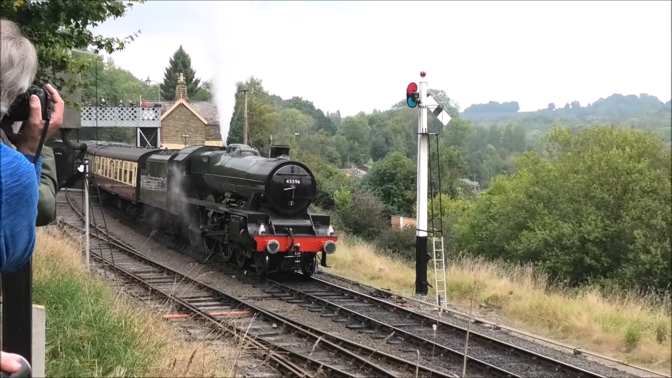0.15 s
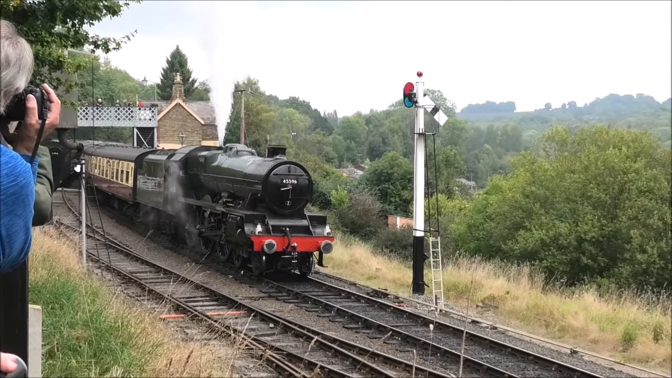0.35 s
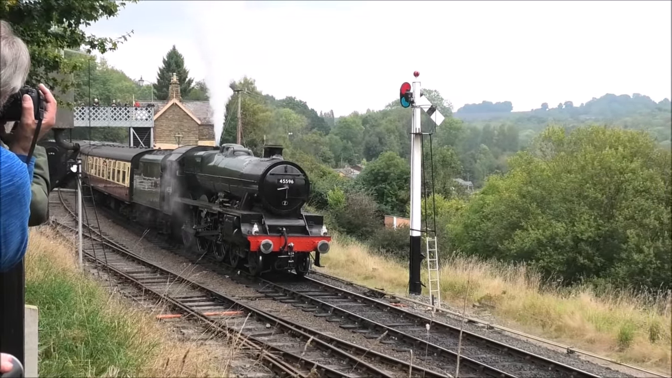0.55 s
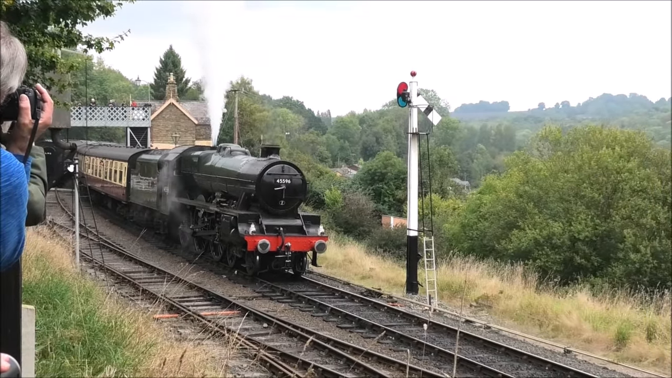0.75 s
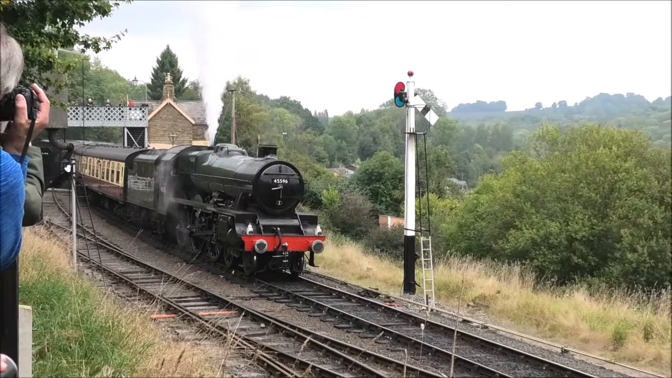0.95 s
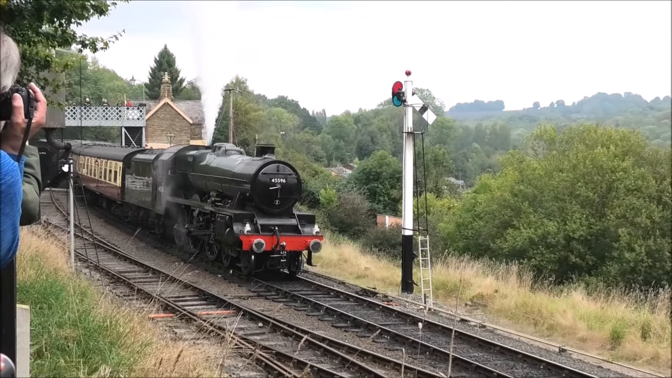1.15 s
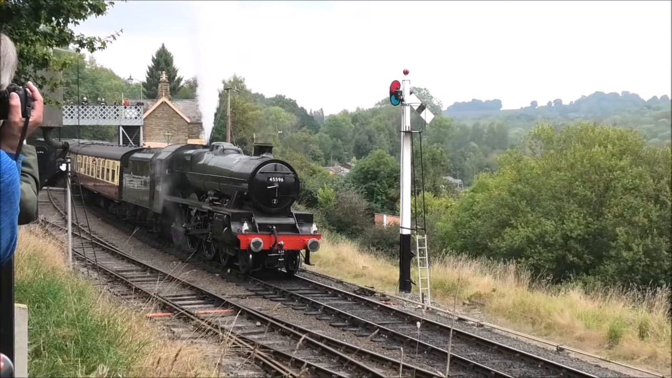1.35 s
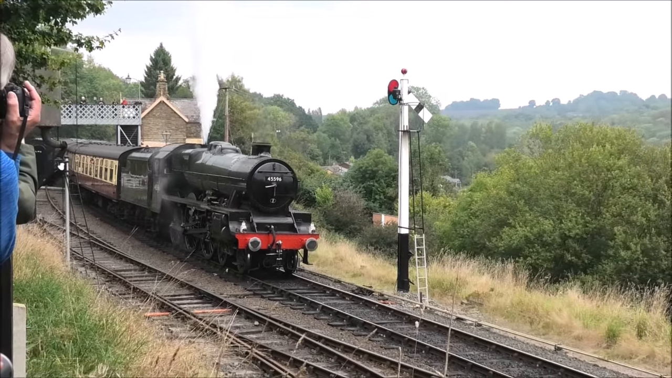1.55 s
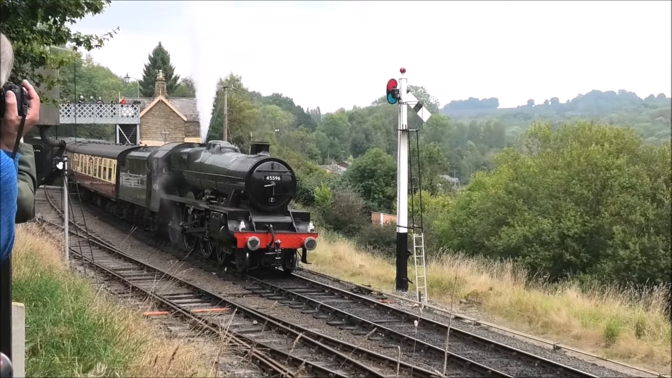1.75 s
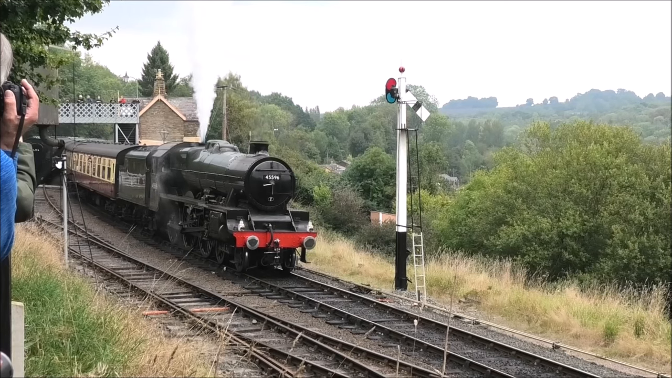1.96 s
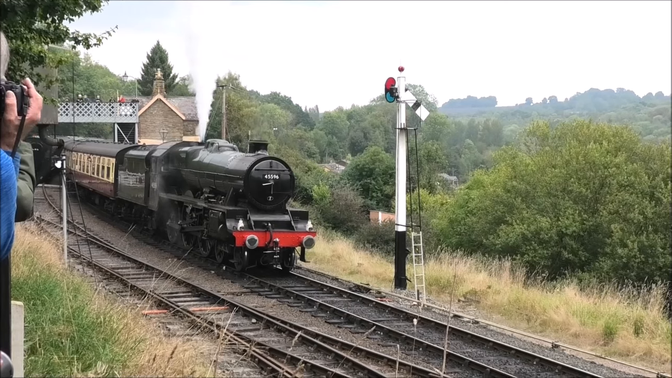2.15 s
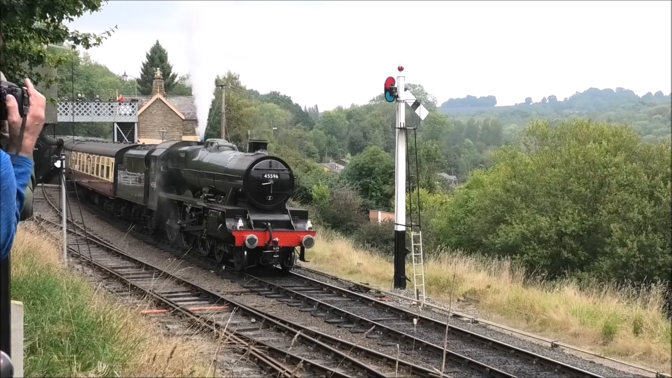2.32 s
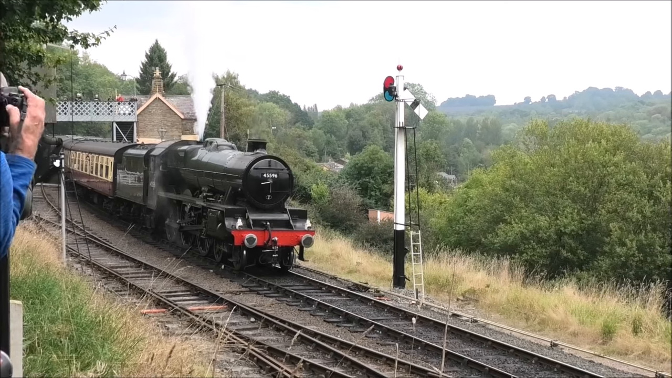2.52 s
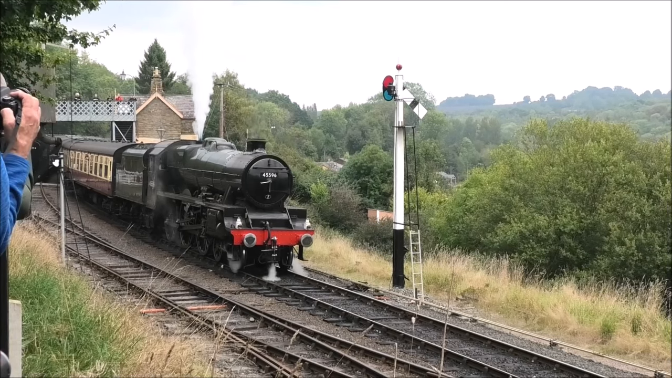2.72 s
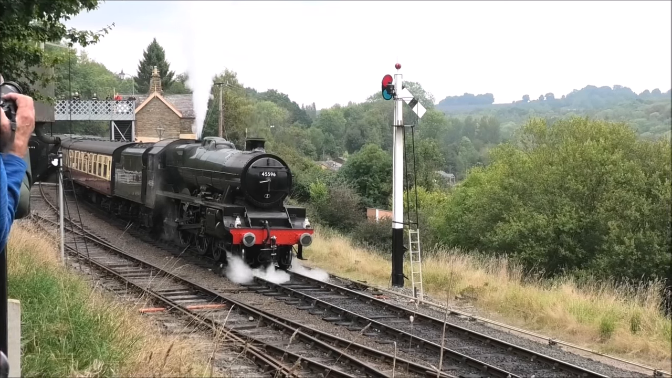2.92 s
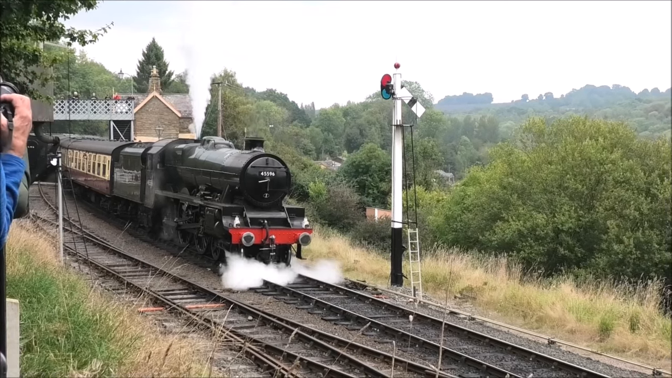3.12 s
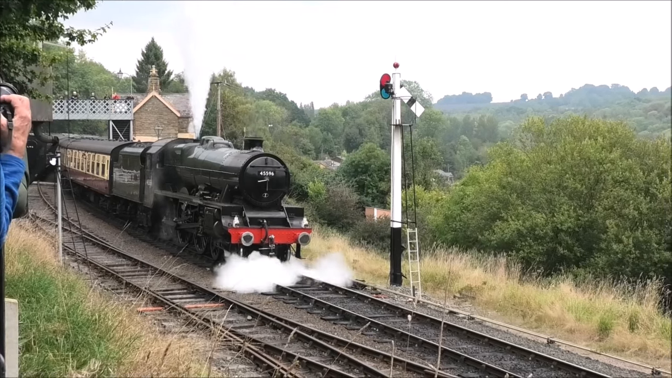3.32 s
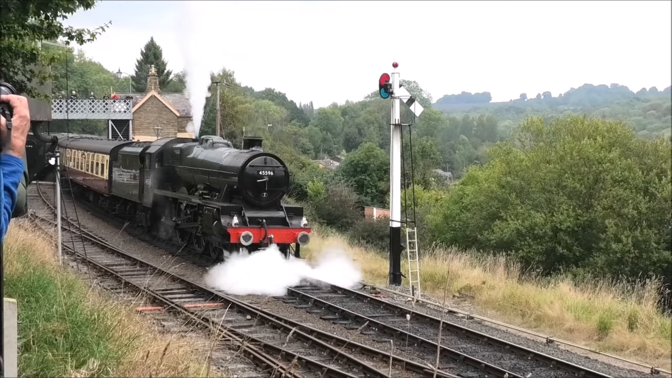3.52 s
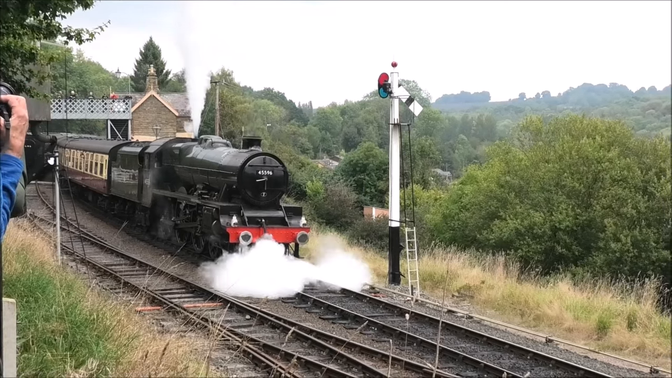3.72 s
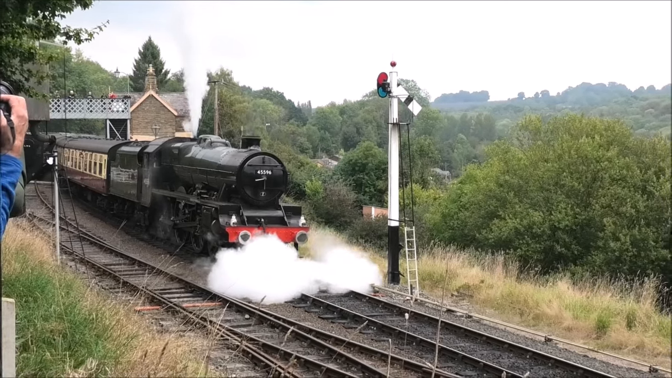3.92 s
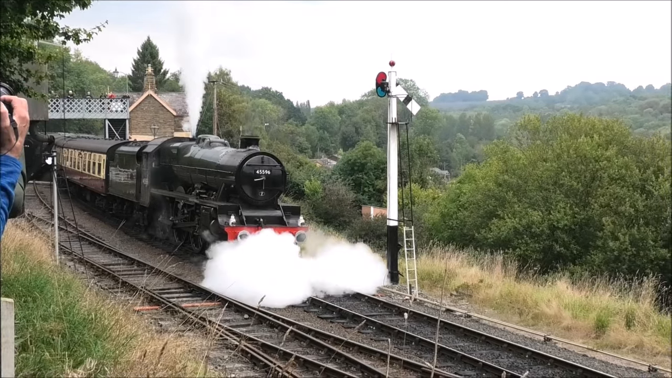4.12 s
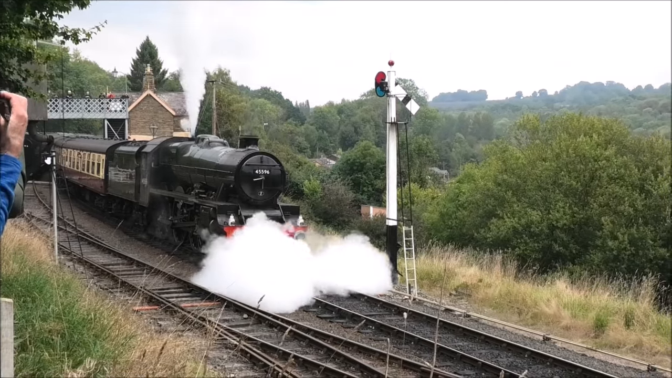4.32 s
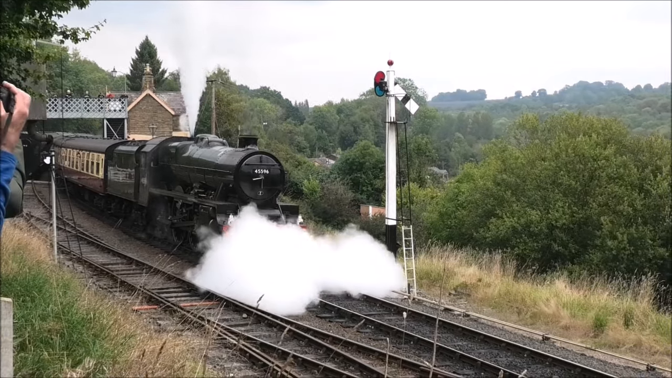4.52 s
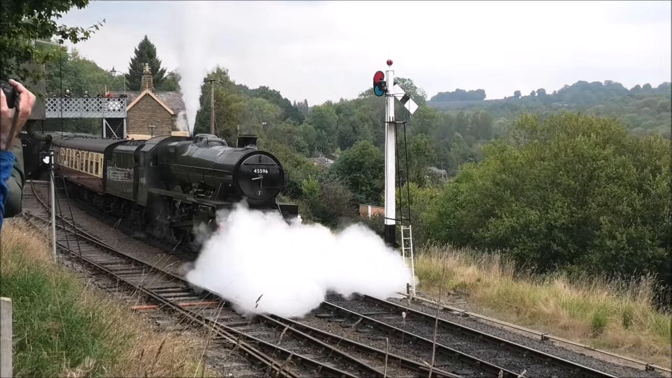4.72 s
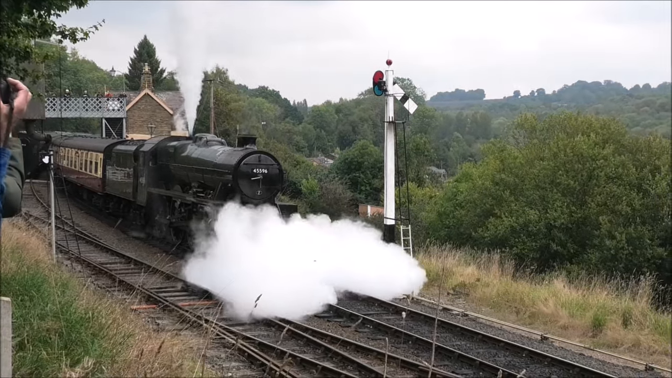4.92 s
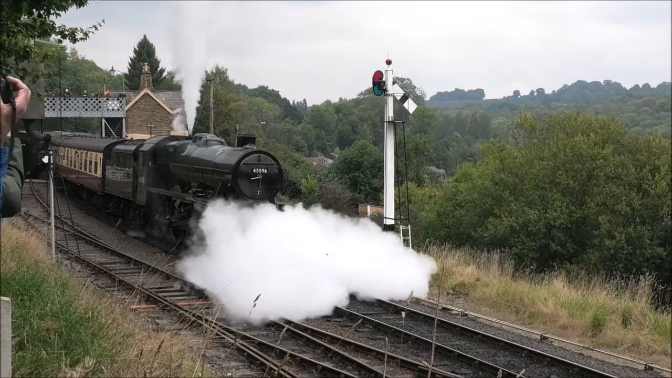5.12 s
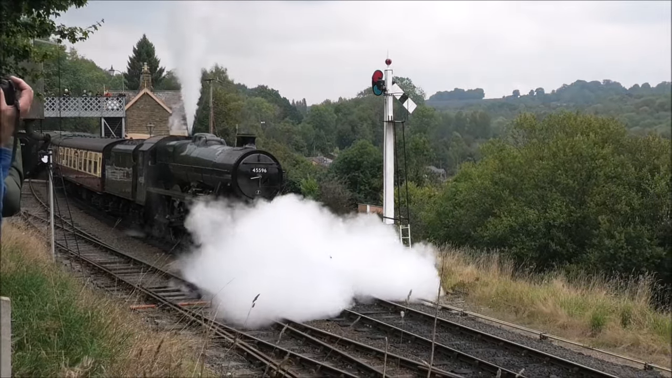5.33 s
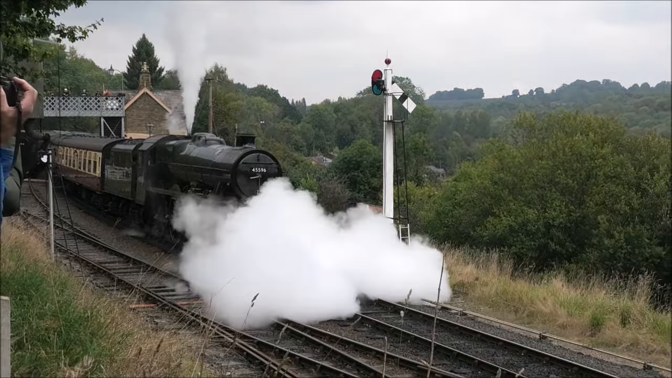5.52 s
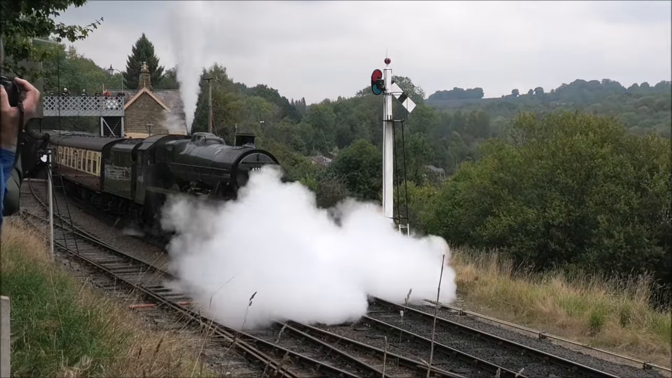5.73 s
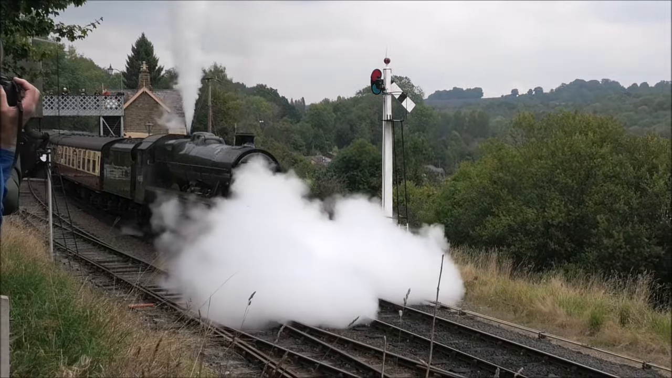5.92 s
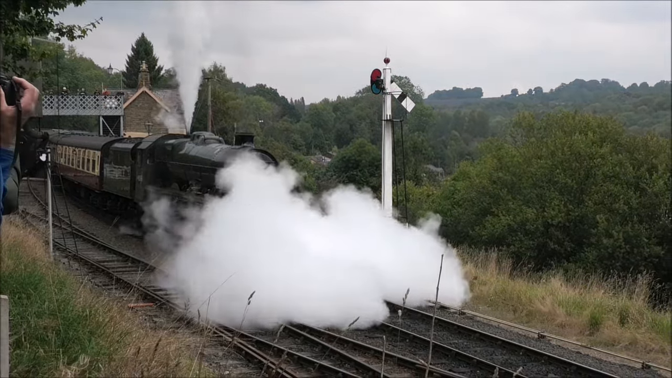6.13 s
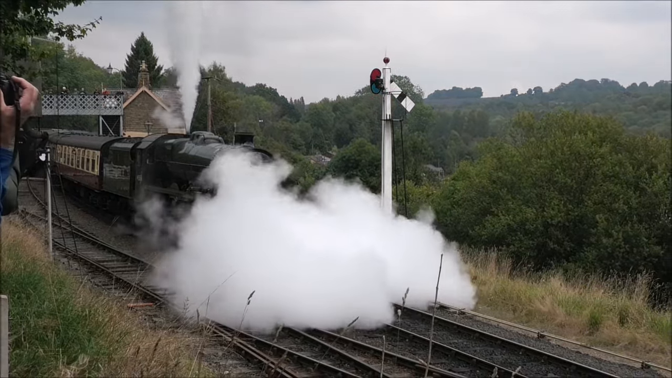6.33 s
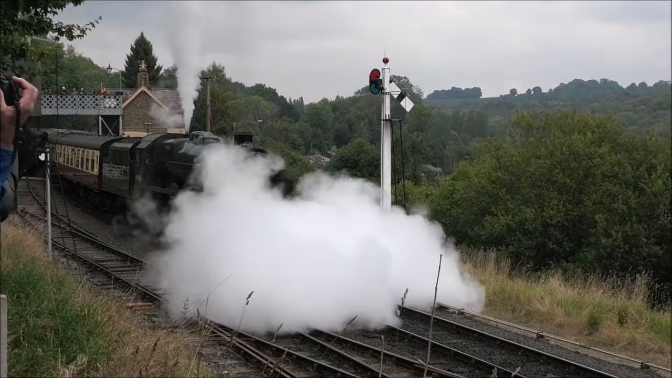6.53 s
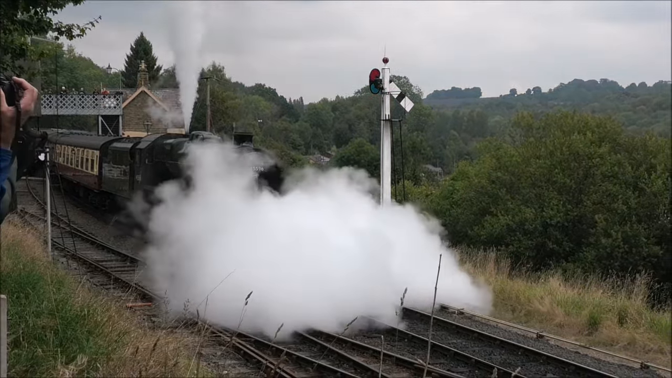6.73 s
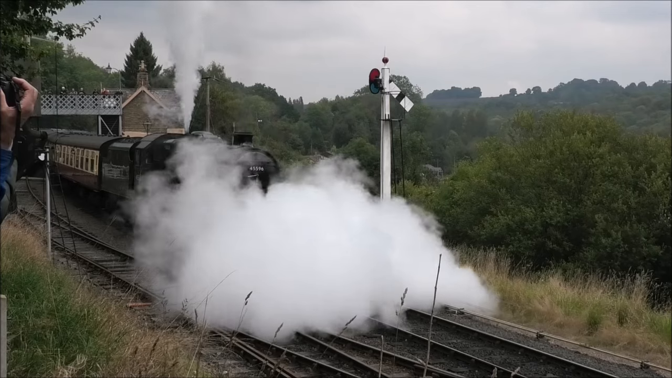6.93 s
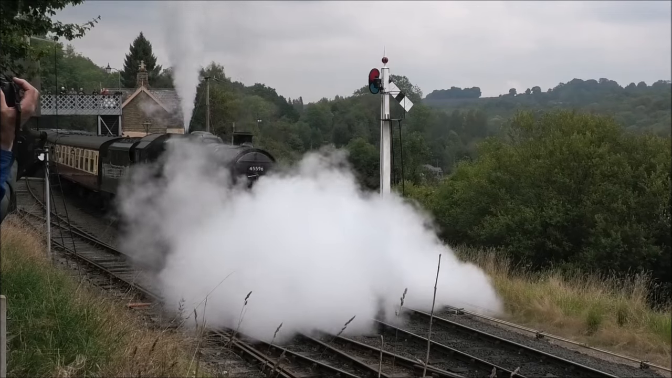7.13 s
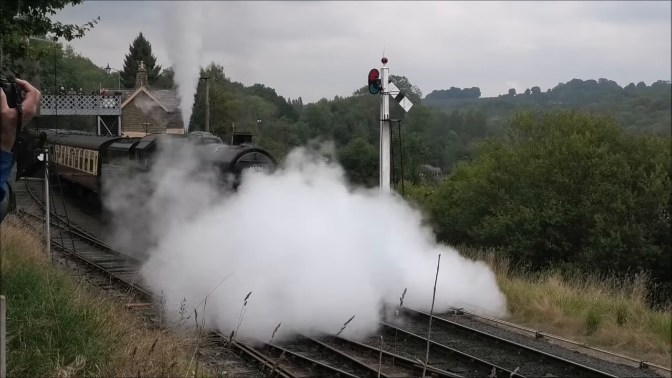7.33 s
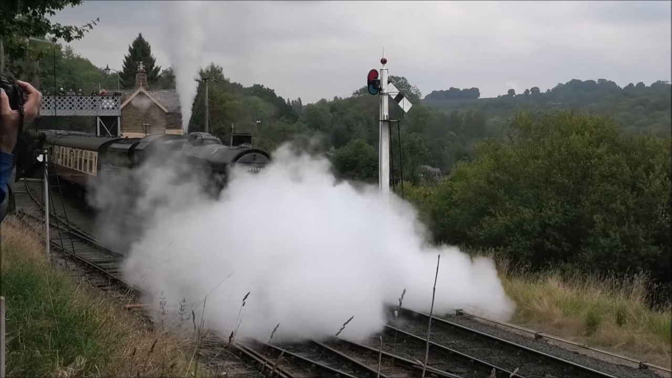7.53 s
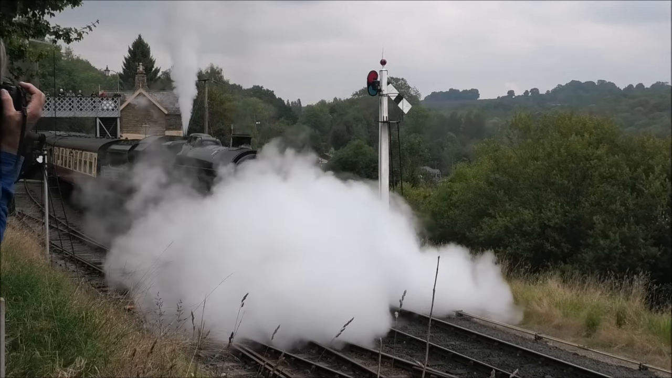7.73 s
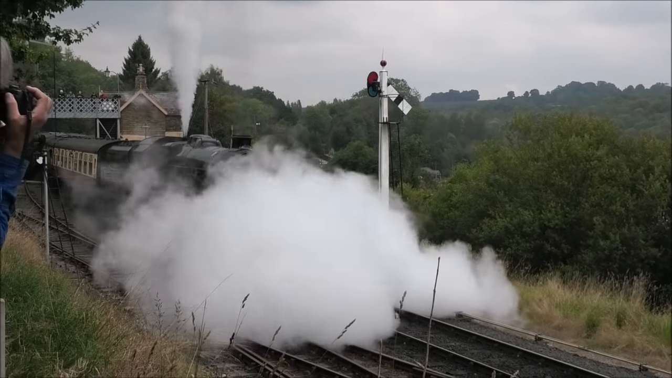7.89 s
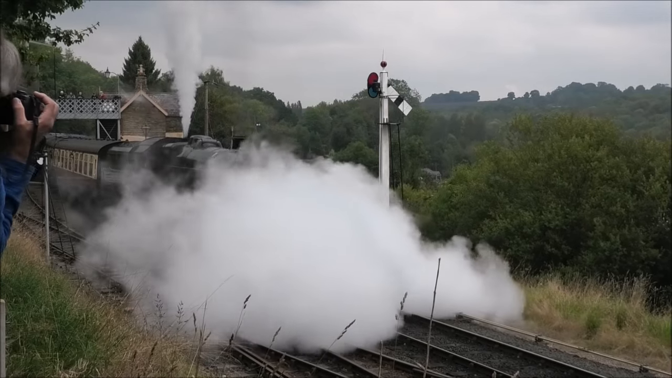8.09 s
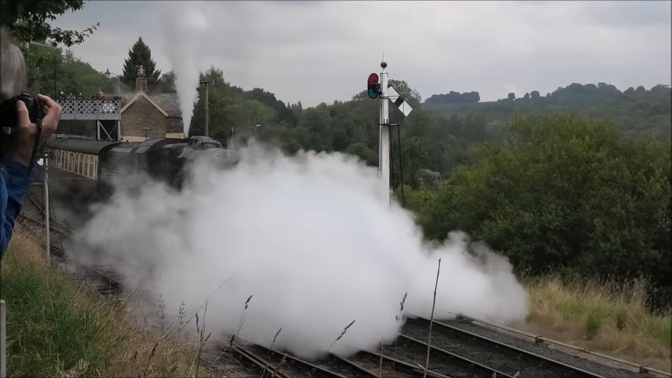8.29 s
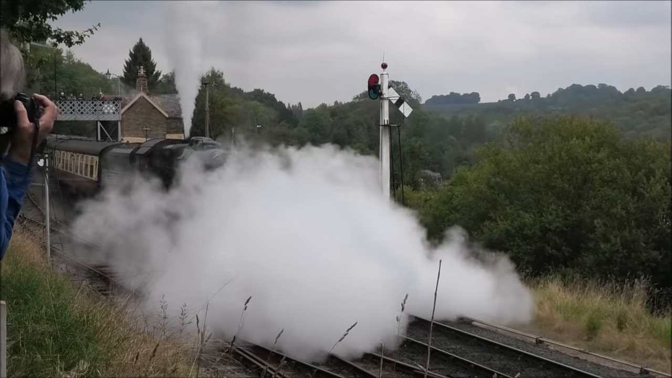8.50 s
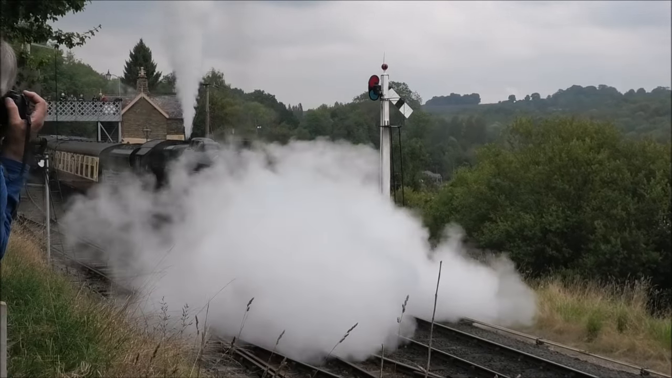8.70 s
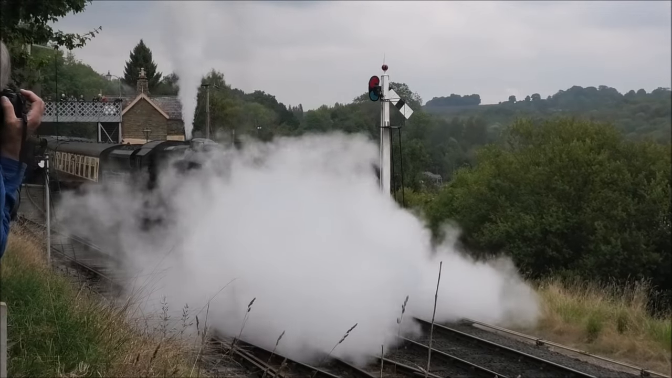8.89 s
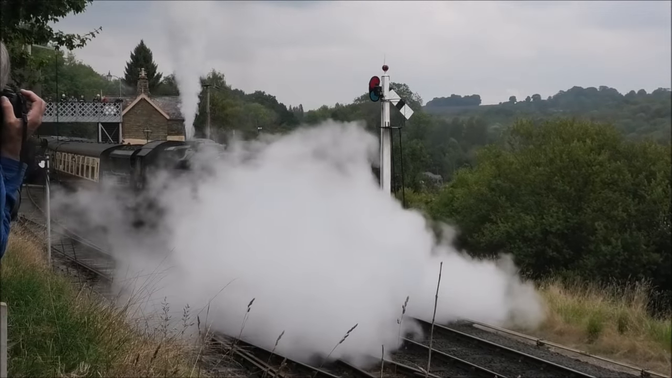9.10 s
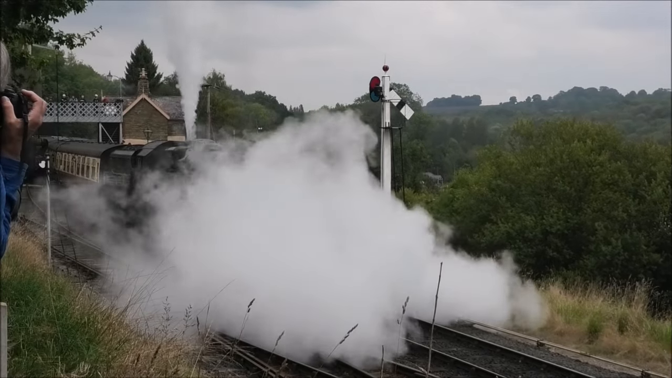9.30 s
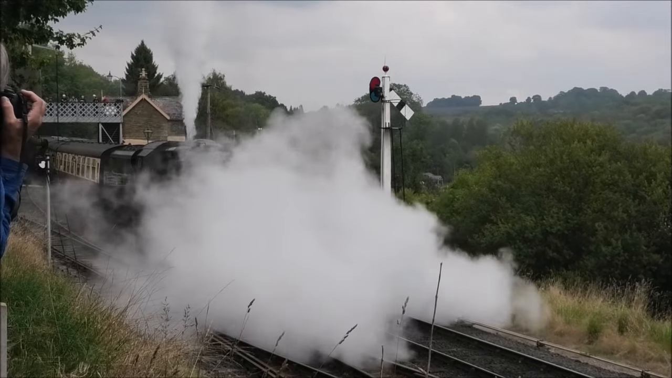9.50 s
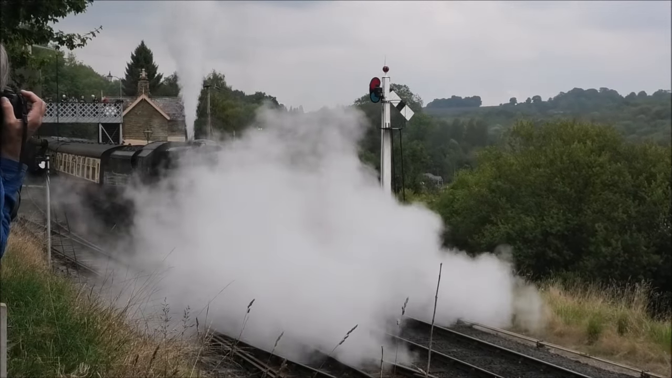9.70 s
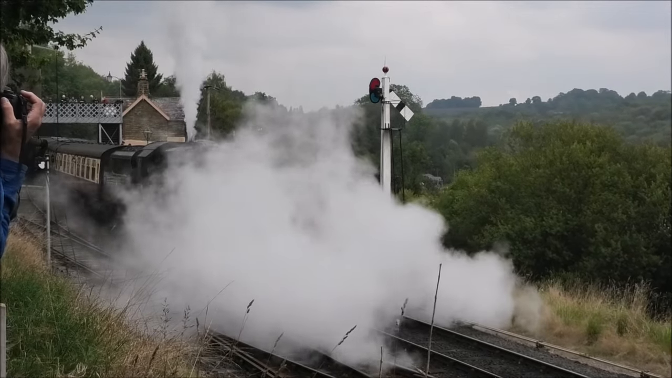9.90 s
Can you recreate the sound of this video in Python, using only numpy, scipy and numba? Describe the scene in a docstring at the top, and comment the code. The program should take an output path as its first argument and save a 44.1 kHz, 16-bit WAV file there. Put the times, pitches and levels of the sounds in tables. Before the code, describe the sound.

Outdoors at a country station, a standing steam locomotive some way off blows off steam in a sharp, breeze-swayed hiss over a soft fire roar. Near three seconds its drain cocks open and a wet, spitting blast swells, with a thin high whistle sliding down. Air buffets low and unevenly. The blast pinches higher, snaps shut, and the steady hiss returns. A trackside microphone overloads and ducks under the blast; both channels are identical.

```python
"""A country station: a steam locomotive stands far off, roaring softly and blowing off steam that the breeze sways.
Its drain cocks open, whistle thinly downwards, blast for three and a half seconds and snap shut.
Steam, fire and buffeting air are noise shaped in colour and strength; whistle and low hums are wavering sines.
At the trackside microphone the gain sinks under the blast and recovers; peaks flatten against a ceiling,
the hiss thins for instants to its core and faint tones, and the top of the treble is cut off."""
import sys
import numpy as np
from scipy import signal
from scipy.fft import rfft, irfft, next_fast_len
from scipy.io import wavfile
from scipy.ndimage import uniform_filter1d
from numba import njit

SR = 44100
rng = np.random.default_rng(int(sys.argv[2]) if len(sys.argv) > 2 else 0)


def master(y):
    """Save y as 16-bit WAV."""
    cut = np.clip(np.atleast_2d(y).T, -1, 1)
    pcm = np.round(cut * 32767)  # scale
    wavfile.write(sys.argv[1], SR, pcm.astype(np.int16))


N = 438779
T = np.arange(N) / SR  # time in s

# colour of the finest mist, in the blow-off and in the drain jet: f/Hz, level/dB
MIST_COLOUR = [(7000, -18), (9500, 1.5), (11000, 1), (13000, 2.5), (16000, 1)]
# the drain cocks open gradually and snap shut: start, opening time, shutting moment, decay constant (s)
OPEN_S, OPENING_S, SHUT_S, SNAP_S = 2.814, 1.27, 6.372, 0.007


def undb(db):
    """Decibels to gain."""
    return 10 ** (np.asarray(db) / 20)


def unit(x):
    """Scale to an rms of 1."""
    return x / np.sqrt(np.mean(x ** 2))


def curves(rows):
    """The columns of a table, joined by straight lines in time."""
    s, *columns = np.transpose(rows)
    return [np.interp(T, s, c) for c in columns]


def swells(rows):
    """Bell-shaped changes (t/s, length/s at half the dB, level/dB ...): a gain curve for each dB column."""
    total_db = 0
    for s, length, *db in rows:
        bell = 2 ** -(2 * (T - s) / length) ** 2
        total_db = total_db + np.outer(db, bell)
    return undb(total_db)


def envelope(start_s, attack_s, hold_s, release_s):
    """A straight rise, a hold and an exponential fall."""
    age = T - start_s
    rise = np.clip(age / attack_s, 0, 1)
    return rise * np.exp(-np.maximum(age - attack_s - hold_s, 0) / release_s)


def walk(rate):
    """Random levels held 1 / rate s and smoothed twice; spread near 1."""
    k = max(int(SR / rate), 1)
    steps = np.repeat(rng.standard_normal(N // k + 1), k)
    return 1.3 * uniform_filter1d(uniform_filter1d(steps, k), k)[:N]


def band(x, hz, width_hz):
    """One resonance, gain 1 at its centre."""
    b, a = signal.iirpeak(min(hz, .45 * SR), hz / width_hz, fs=SR)
    return signal.lfilter(b, a, x)


def turbulence(spectrum, flutter_db, flutter_rate):
    """Jet noise of rms 1: eddies of each size, half an octave apart, swell and fade on their own."""
    size = next_fast_len(N, True)
    octave = np.log2(np.maximum(np.arange(size // 2 + 1) * SR / size, 1))
    hz, db = np.transpose(spectrum)
    noise = rfft(rng.standard_normal(size)) * undb(np.interp(octave, np.log2(hz), db))
    first, last = np.floor(2 * np.log2(hz[0])), np.ceil(2 * np.log2(hz[-1]))
    out = 0
    for centre in np.arange(first, last + 1) / 2:
        # overlapping triangular bands
        eddies = irfft(noise * np.maximum(1 - 2 * np.abs(octave - centre), 0), size)[:N]
        out = out + eddies * undb(flutter_db * walk(flutter_rate))
    return unit(out)


def tone(hz, waver, waver_rate, flutter_db):
    """A flow tone, unsteady in pitch and strength."""
    phase = 2 * np.pi * np.cumsum(hz * (1 + waver * walk(waver_rate))) / SR
    return np.sqrt(2) * np.sin(phase) * undb(flutter_db * walk(waver_rate / 4))


def ground_echo(x, lag_s, echo_db):
    """A second path by way of the ground ripples the spectrum."""
    return x + undb(echo_db) * np.interp(T - lag_s, T, x, left=0)


def blow_off():
    """The steady escape of steam: a sharp core under spray and mist that the breeze sways."""
    # the breeze carries the hiss over in swells: t/s, length/s, core level/dB, spray level/dB, mist level/dB
    breeze_swells = [(.15, 0.37, 1.5, 3, -1), (.52, .45, 1.4, 4.5, 4), (1.22, 0.43, -0.5, 5, 9.5),
                     (2.03, 0.26, 0.5, -1, 6.5), (2.67, 0.31, -.5, 4, 6), (6.9, 0.47, -0.5, 5.5, 6),
                     (7.68, .3, 0.5, 0, 5), (8.08, 0.45, 1, 2, 3), (8.56, .4, .5, 5, 4.5),
                     (9.08, 0.23, 1, -1, 0), (9.77, 0.25, 0.5, 2, 6.5)]
    # colour of the sharp core: f/Hz, level/dB
    core_colour = [(1300, -24), (1750, -14), (1900, -10.5), (2130, -8.5), (2400, -3.5), (2660, -6.5),
                   (3000, -1.5), (3480, 1.5), (3900, -3), (4150, -6), (4450, -14.5), (6000, -14),
                   (7500, -30)]
    # colour of the swaying spray: f/Hz, level/dB
    spray_colour = [(3600, -13), (4600, -5), (5600, -3.5), (7000, 0), (8400, 0.5), (10000, -4.5),
                    (12000, -7), (16000, -25)]
    core_gain, spray_gain, mist_gain = swells(breeze_swells)
    core = undb(-21.5) * core_gain * turbulence(core_colour, flutter_db=0.8, flutter_rate=20)
    spray = undb(-27) * spray_gain * turbulence(spray_colour, flutter_db=1.93, flutter_rate=9)
    mist = undb(-28.5) * mist_gain * turbulence(MIST_COLOUR, flutter_db=0.8, flutter_rate=14.0)
    # moving air keeps changing the length of the second path, so the ripples drift
    lag_s = .0011 * (1 + .035 * walk(1.5))
    return ground_echo(core + spray + mist, lag_s, echo_db=-19)


def fire():
    """The draught roars through firebox and chimney over a low rumble."""
    # draught through the fire: t/s, level/dB, level above 950 Hz relative to that below/dB
    draught = [(0, -33, -2.5), (.35, -32.5, -4.5), (.65, -35.5, -3), (1.6, -36.5, -3), (2.1, -34, -2.5),
               (2.85, -31, -1), (3.15, -41.5, 11), (6.4, -34, -3.5), (7.05, -38, -1.5), (7.8, -32.5, -3),
               (8.5, -32, -1), (8.9, -35.5, -1.5), (9.55, -32.5, 2.5), (9.95, -33, 2)]
    # colour of the roar: f/Hz, level/dB
    roar_colour = [(150, -21.5), (220, -15), (300, -6), (400, -4.5), (510, 1), (620, -0.5), (740, -0.5),
                   (900, -1.5), (1200, -2.5), (1480, 1), (1750, -5), (2600, -7.5)]
    # colour of the rumble: f/Hz, level/dB
    rumble_colour = [(20, -8), (45, -10), (80, -3), (140, 2), (200, -7), (400, -31)]
    level_db, bright_db = curves(np.vstack(draught))
    roar = turbulence(roar_colour, flutter_db=0.95, flutter_rate=12)
    low = signal.sosfiltfilt(signal.butter(3, 950, fs=SR, output="sos"), roar)
    roar = unit(low) + undb(bright_db) * unit(roar - low)
    rumble = undb(-54.5) * turbulence(rumble_colour, flutter_db=-0.5, flutter_rate=7)
    return undb(level_db) * roar + rumble


def gusts(flow):
    """Moving air buffets in low, uneven lumps, most while the steam billows."""
    # gusts that strengthen the buffeting: t/s, length/s, level/dB
    gust_rows = [(.1, 0.44, 9), (3.78, .35, 6.5), (5.08, 0.29, 13), (5.55, 0.33, 8), (6.33, 0.12, 8),
                 (7.95, .5, 8), (9.78, 0.38, 9)]
    # colour of the buffeting: f/Hz, level/dB
    billow_colour = [(20, 0), (60, 0.5), (130, 0), (260, -4.5), (500, -13)]
    gust, = swells(gust_rows)
    lumps = undb(2.5 * walk(20))
    strength = undb(-58) + undb(-35.5) * flow  # open air, then billowing steam
    return gust * lumps * strength * turbulence(billow_colour, flutter_db=2.5, flutter_rate=31)


def hums():
    """Short, wavering low hums that sink in pitch."""
    # each hum: t/s, length before its fall/s, starting f/Hz, level/dB
    hum_rows = [(2.69, .19, 93.7, -47), (3.06, 0.13, 87.7, -51), (6.86, 0.12, 82, -49),
                (8.837, 0.51, 152.6, -48), (9.41, 0.083, 92, -49), (9.55, .11, 83.5, -47),
                (9.78, .17, 85.2, -48)]
    sag_octaves_per_s, attack_s, release_s = .75, .06, .06
    out = 0
    for s, length, hz, db in hum_rows:
        pitch = hz * 2 ** (-sag_octaves_per_s * np.maximum(T - s, 0))
        strength = undb(db) * envelope(s, attack_s, length - attack_s, release_s)
        out = out + strength * tone(pitch, waver=0.051, waver_rate=90, flutter_db=1)
    return out


def steam_flow():
    """Strength of the drain jet: it grows as a power of the opening."""
    opening = envelope(OPEN_S, OPENING_S, SHUT_S - OPEN_S - OPENING_S, SNAP_S)
    return undb(-7) * opening ** 1.2


def drain_cocks(flow):
    """Wet steam blasts along the track; the closing cocks pinch the jet to a higher note."""
    # the wet jet spits: t/s, length/s, core level/dB, spray level/dB, mist level/dB
    spits = [(3.0, 0.19, 7.5, 8, -6), (3.55, 0.25, 3, 1, 10.5), (3.8, 0.24, 3, 4, 2),
             (4.45, 0.17, 1.5, 1, 7), (4.93, 0.13, -1.5, 2, 0), (5.1, 0.15, 1, 2.5, -2),
             (5.52, 0.11, -0.5, 3, -6), (5.72, 0.2, 0.5, -1, -2), (5.85, .12, -3, 2.5, 8.5)]
    # colour of the jet's core: f/Hz, level/dB
    core_colour = [(1800, -14), (2450, -8.5), (2700, -5), (3000, -2), (3380, 0.5), (3750, -4), (4100, -7),
                   (4400, -20), (4800, -10.5), (5600, -21)]
    # colour of its low rush: f/Hz, level/dB
    rush_colour = [(300, -20), (500, -18), (700, -14), (1000, -5.5), (1300, -2), (1550, -0.5), (1800, -4),
                   (2100, -1), (2600, -11.5), (4000, -44)]
    # colour of its spray: f/Hz, level/dB
    spray_colour = [(3200, -5), (4400, 0), (5400, -0.5), (7000, 0.5), (8600, 1), (10000, -2), (12000, -7),
                    (16000, -29)]
    # colour of the pinched jet: f/Hz, level/dB
    pinched_colour = [(5000, -12), (6500, -6), (7900, 2), (9500, -4), (12000, -17)]
    core_gain, spray_gain, mist_gain = swells(spits)
    core = turbulence(core_colour, flutter_db=1.2, flutter_rate=20)
    ring = band(rng.standard_normal(N), hz=3360, width_hz=220)
    jet = core_gain * (core + undb(-9.5) * unit(ring))  # the drain pipe rings
    # the low rush comes in later than the hiss: it grows by a further power of the flow
    rush_gain = undb(-6.5) * (flow / flow.max()) ** 0.37
    jet = jet + rush_gain * turbulence(rush_colour, flutter_db=2.0, flutter_rate=18)
    jet = jet + undb(-4) * spray_gain * turbulence(spray_colour, flutter_db=2.0, flutter_rate=18)
    jet = jet + undb(-12) * mist_gain * turbulence(MIST_COLOUR, flutter_db=0.6, flutter_rate=12)
    jet = ground_echo(jet, lag_s=1 / 335, echo_db=-18)
    # the nearly shut cocks sing higher for the last moment
    pinch_s, pinch_rise_s = 6.17, 0.12
    pinch = undb(-9) * envelope(pinch_s, pinch_rise_s, SHUT_S - pinch_s - pinch_rise_s, SNAP_S)
    return flow * jet + pinch * turbulence(pinched_colour, flutter_db=0.6, flutter_rate=14)


def whistle():
    """A thin whistle falls as the cock opens wider, while it swells and dies away."""
    start_s, start_hz, end_hz, settle_s = 3.5, 15850, 10700, .53
    age = np.maximum(T - start_s, 0)
    hz = end_hz + (start_hz - end_hz) * np.exp(-age / settle_s)
    strength = undb(-14) * envelope(start_s, attack_s=.14, hold_s=.33, release_s=.21)
    return strength * tone(hz, waver=.0035, waver_rate=600, flutter_db=1.0)


def scene():
    """All of it comes from one far spot, alike in both ears."""
    flow = steam_flow()
    air = blow_off() + fire() + drain_cocks(flow) + gusts(flow) + whistle() + hums()
    return np.array([air, air])


@njit
def follow(x, attack, release):
    """A level follower that rises quickly and sinks slowly."""
    out, e = np.empty(len(x)), 0.
    for i in range(len(x)):
        e += (x[i] - e) * (attack if x[i] > e else release)
        out[i] = e
    return out


def gain_control(x, limit_db, attack_s, release_s):
    """The gain falls as far as needed to hold the followed level at the limit."""
    level = follow(np.abs(x), 1 / (attack_s * SR), 1 / (release_s * SR))
    return x / np.maximum(level / undb(limit_db), 1)


def overload(x, ceiling, order=6):
    """Peaks are flattened softly against the ceiling."""
    return x / (1 + np.abs(x / ceiling) ** order) ** (1 / order)


def lulls(x, tone_db, core_hz, core_width_hz, count=12):
    """For an instant the broad hiss drops away, leaving its core and some faint tones."""
    # moments when the hiss thins: t/s, length/s, level/dB
    lull_rows = [(1.991, .013, -13), (2.632, .018, -8), (2.672, .018, -8), (3.122, .016, -9),
                 (3.359, .016, -9), (3.804, .016, -8), (3.902, .031, -30), (4.233, .02, -7),
                 (4.83, .016, -8), (4.912, .018, -8), (5.043, .016, -9), (6.153, .017, -10),
                 (6.813, .019, -10), (6.941, .021, -11), (8.221, .016, -9), (8.297, .036, -22),
                 (8.68, .036, -22), (9.648, .014, -22), (9.78, .018, -10), (9.862, .021, -9)]
    edges = [core_hz - core_width_hz / 2, core_hz + core_width_hz / 2]
    core = signal.sosfiltfilt(signal.butter(4, edges, "band", fs=SR, output="sos"), x)
    broad = x - core
    out = x.copy()
    chances = rng.uniform(size=(len(lull_rows), count))
    for (s, length, depth_db), chance in zip(lull_rows, chances):
        near = np.abs(T - s) < 2 * length
        offset = 2 * (T[near] - s) / length
        tone_hz = 1000 * 13 ** np.sqrt(chance)  # 1 to 13 kHz, crowding upwards
        tones = unit(np.sin(2 * np.pi * np.outer(T[near], tone_hz)).sum(axis=1))
        # the deeper the lull, the fainter its tones
        tones *= undb(tone_db + depth_db / 4) * broad[near].std() * np.exp(-offset ** 2 / 2)
        out[near] += tones - (1 - undb(depth_db)) * broad[near] * np.exp(-offset ** 6)
    return out


def record(dry):
    """One microphone channel: gain control, an input that the blast overloads, brief lulls and the top cut."""
    held = gain_control(dry.mean(axis=0), limit_db=-1.95, attack_s=0.0021, release_s=0.54)
    flattened = overload(held, ceiling=.5)
    thinned = lulls(flattened, tone_db=-3.5, core_hz=3350, core_width_hz=1150)
    top_cut = signal.ellip(12, .1, 90, 15850, fs=SR, output="sos")  # low-pass edge in Hz
    out = signal.sosfilt(top_cut, thinned)
    return np.array([out, out])


dry = scene()
out = record(dry)
master(out)
```